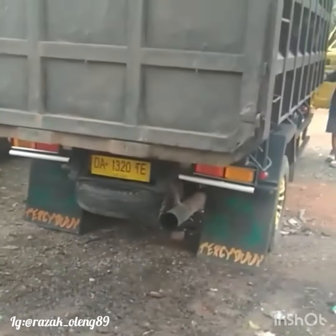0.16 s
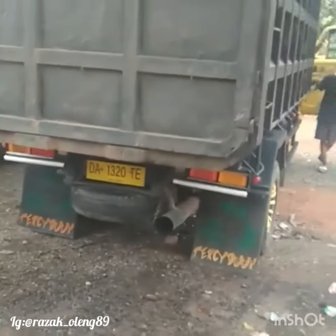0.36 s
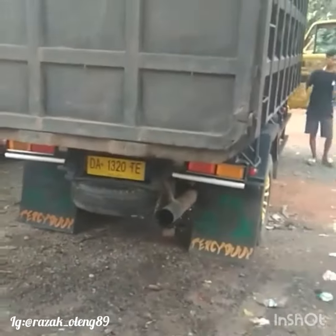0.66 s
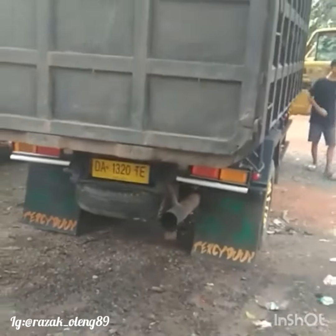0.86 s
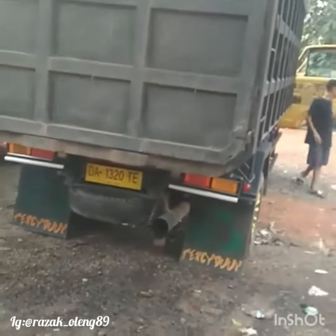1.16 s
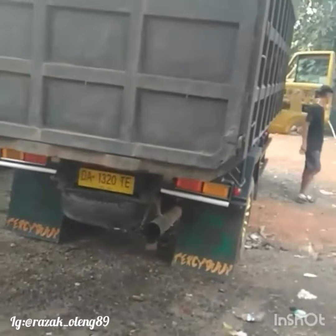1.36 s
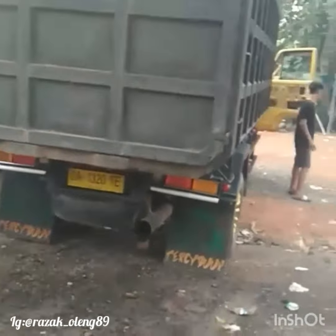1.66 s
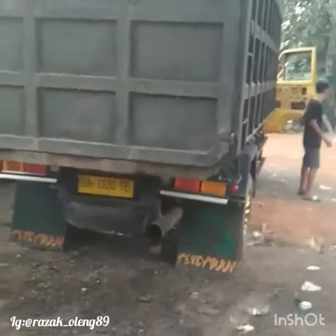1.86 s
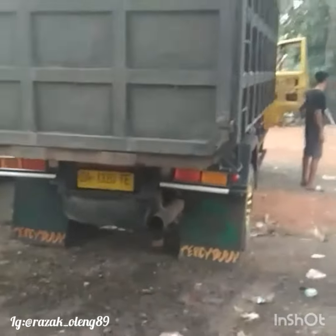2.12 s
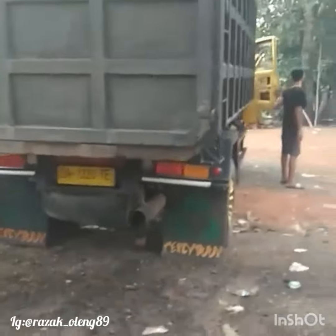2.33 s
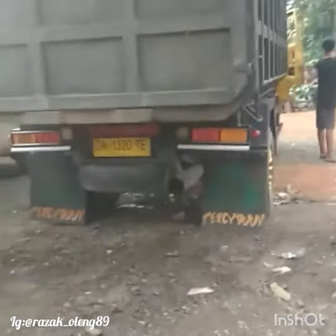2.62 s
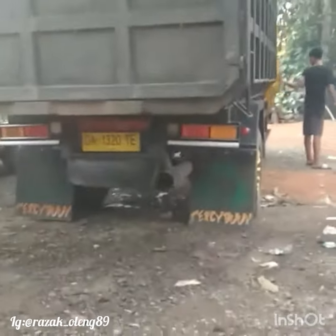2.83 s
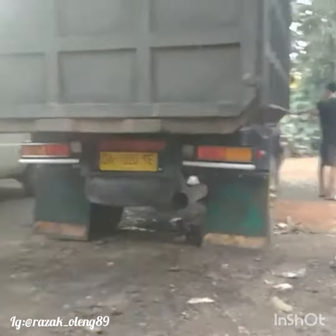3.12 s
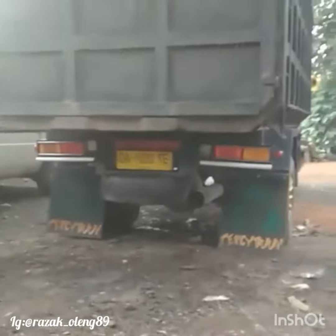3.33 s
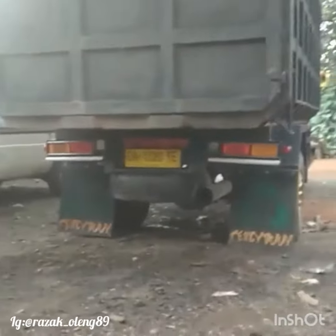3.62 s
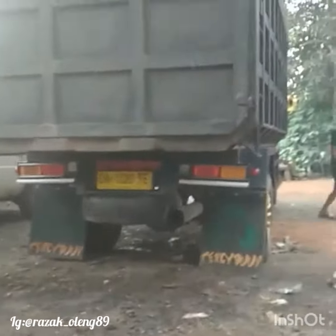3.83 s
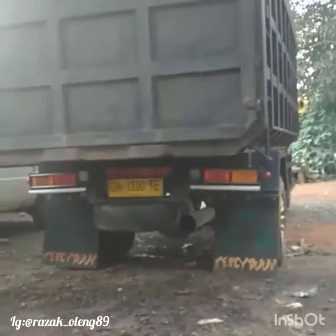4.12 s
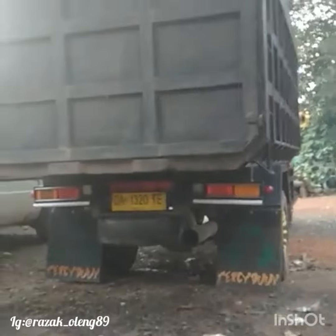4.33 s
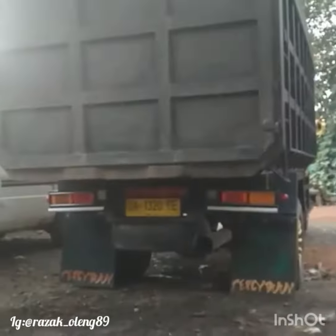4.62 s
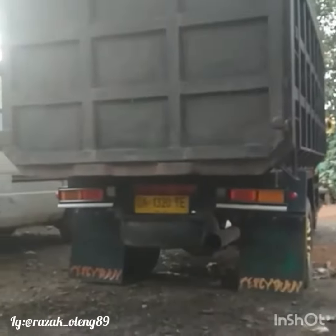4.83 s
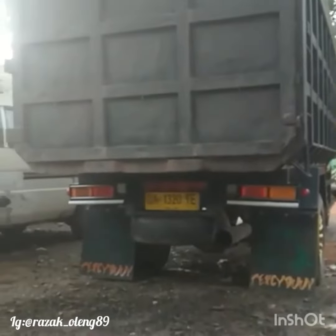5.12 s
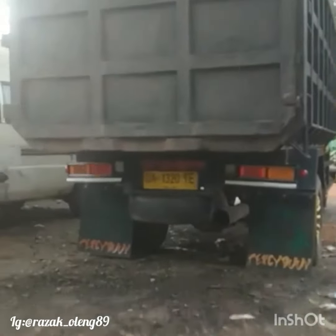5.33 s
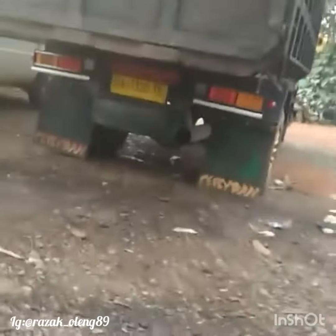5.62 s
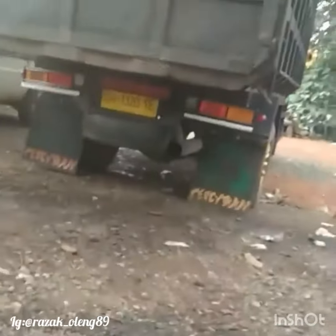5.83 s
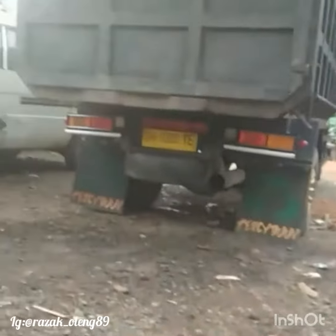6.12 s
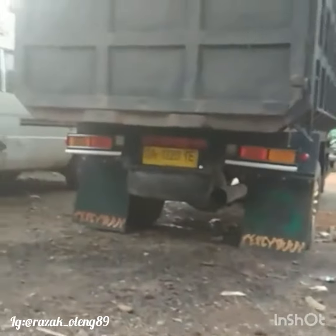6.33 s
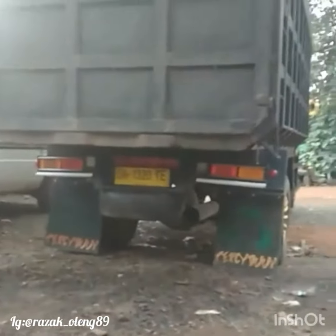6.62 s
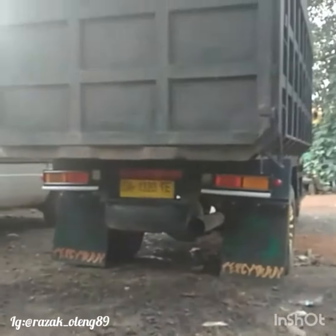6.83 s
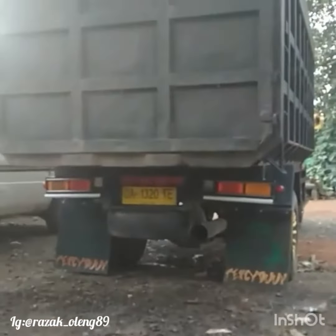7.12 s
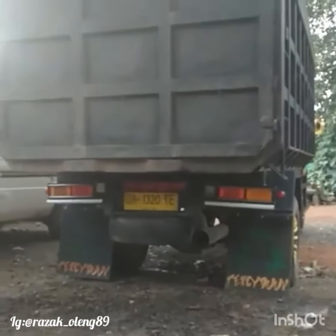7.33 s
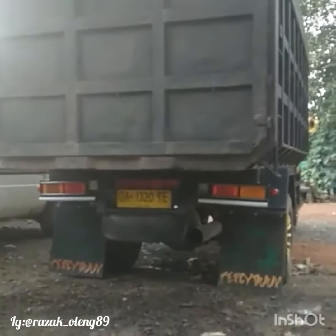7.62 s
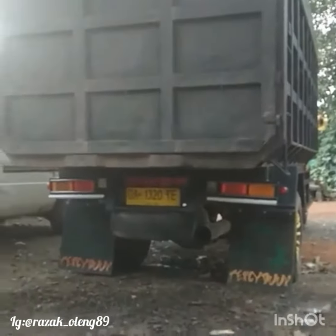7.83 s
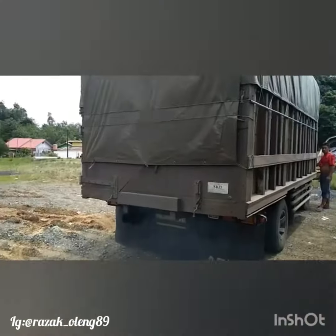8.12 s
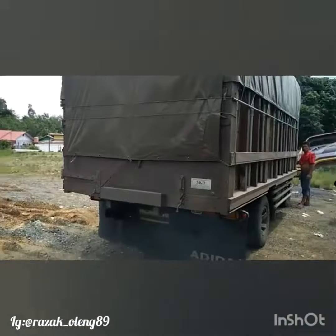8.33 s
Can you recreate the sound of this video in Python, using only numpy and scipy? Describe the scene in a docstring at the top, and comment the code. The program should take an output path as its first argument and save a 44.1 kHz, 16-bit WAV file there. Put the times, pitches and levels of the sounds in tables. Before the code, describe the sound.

A low, loping diesel idle with deep puffs and knocking dominates, heard near the exhaust in open air. Over it lie gritty crunches, small stone snaps, metallic clinks, thin chirps and an empty steel box booming once. Later the engine surges in pulses and wet hiss increases. The sound cuts out very briefly, then a far louder, fast, buzzing truck exhaust barks and drops in pitch until the abrupt end.

```python
"""A slow, loping diesel is heard first: a dump truck with four cylinders creeps over wet gravel.
Its cylinders send unequal blasts and puffs of gas through an open tailpipe and knock on the engine block.
Filtered noise makes grit crunch and hiss, ringing tones make steel knock and boom, gliding tones squeak.
After a short silence a second truck, far louder, barks and comes down from a rev: a sum of sliding
harmonics with rasping noise at each firing."""
import sys
import numpy as np
from scipy import signal
from scipy.fft import rfft, irfft, next_fast_len
from scipy.io import wavfile
from scipy.ndimage import uniform_filter1d

SR = 44100
rng = np.random.default_rng(int(sys.argv[2]) if len(sys.argv) > 2 else 0)


def transcribe(signal):
    """Save signal, clipped to [-1, 1], as a 16-bit WAV file at the path in sys.argv[1]."""
    frames = np.atleast_2d(signal).T
    limited = np.clip(frames, -1, 1)
    pcm = np.round(limited * 32767).astype(np.int16)
    wavfile.write(sys.argv[1], SR, pcm)


N = 373304
T = np.arange(N) / SR  # time of every sample in seconds

# The four cylinders of the slow engine. Each row: lag behind even firing in seconds, pitch of its chuff in Hz,
# chuff level in dB, chuff rise in seconds, level of its deep thump in dB.
CYLINDERS = [(.0092, 108.4, -0.5, 0.0089, -40), (-.0029, 142.6, -8, 0.03, -15.5),
             (.0083, 129.4, -5, 0.014, -23.5), (.0195, 116, -4, 0.0041, -17)]
# The silence between the trucks: its start and end in seconds.
SILENCE = (7.84, 7.916)
# Tone of flying grit and small stones. Each row: pitch in Hz, relative level in dB per Hz.
GRIT_TONE = [(800, 7), (3000, 5.5), (4500, 11.5), (5800, 4), (7500, 11), (13000, 6)]


def idle(jitter_s=0.0003, uneven_db=1.0, labour_jitter_s=0.001506, labour_uneven_db=1.0, gas_db=-44,
         metal_db=-49.0, puff_s=0.13, steady=0.92, repeat=0.45, rumble_db=-43):
    """Four unequal cylinders knock, ring the pipe and each let out a puff of gas."""
    # Ringing of tailpipe and silencer. Each row: pitch in Hz, width in Hz, level in dB.
    pipe_modes = [(37.9, 3.9, 21), (60.5, 5.1, 20), (110.6, 4, 7.5), (153.7, 4.5, 6.5), (188.8, 6.6, 16),
                  (241, 7.8, 18.5)]
    # Tone of the gas and clatter. Each row: pitch in Hz, relative level in dB per Hz.
    gas_tone = [(100, -34.5), (170, -1.5), (318, -8), (364, -9.5), (404, -15), (462, -9.5), (586, -8.5),
                (790, -12), (903, -14), (1350, -14.5), (2180, -20.5), (4130, -33), (6000, -49.5),
                (7800, -113), (13200, -120)]
    # Tone of the formless rumble. Each row: pitch in Hz, relative level in dB per Hz.
    rumble_tone = [(10, -29), (25, -21), (40, -24), (70, 0), (115, -8.5), (160, -4.5), (220, -6.5),
                   (400, -20), (900, -91.5)]
    # Metal parts that ring in the clatter. Each row: pitch in Hz, width in Hz, level in dB.
    metal_modes = [(370.3, 58, 7), (452.3, 23, 6.5), (804, 45, -3), (1034, 140, -3), (1300, 26, -24)]
    # Exhaust level over time. Each row: time in seconds, level in dB.
    exhaust_levels = [(0, -30.5), (1.8, -33), (2.6, -30.5), (3.8, -31.5), (4.8, -31), (6.2, -32.5),
                      (7.3, -32), (7.84, -29.5)]
    # The engine hunts under load and surges on every other cycle. Each row: time in seconds, gain in dB.
    surges = [(5.43, 4), (5.93, 5), (6.41, 6.5), (6.89, 5.5), (7.36, 4)]
    # The part of the pipe's note that swells. Each row: pitch in Hz, width in Hz, level in dB.
    surge_modes = [(122, 160, 4.5)]
    firings_per_s, sag_per_s = 16.9, 0.03  # rate at the opening, and its loss each second under load
    first_firing_s, lead_s, surge_width_s = 0.103, 0.6, 0.06
    labour_from_s, labour_build_s = 5.7, 1.0  # the engine starts to labour and fires more raggedly
    knock_delay_s = 0.0251

    clock = T - lead_s  # the engine is already running when the scene opens
    count = np.cumsum(firings_per_s - sag_per_s * clock) / SR
    count -= np.interp(first_firing_s, clock, count)
    k = np.arange(-2 * len(CYLINDERS), int(count[-1]))
    cylinder = k % len(CYLINDERS)
    chance = rng.standard_normal((len(k), 2))
    beat = np.interp(k, count, clock)
    labour = np.clip((beat - labour_from_s) / labour_build_s, 0, 1)
    lag = np.array(CYLINDERS)[cylinder, 0]
    firing = beat + lag + (jitter_s + labour_jitter_s * labour) * chance[:, 0]
    size = amp((uneven_db + labour_uneven_db * labour) * chance[:, 1])  # no two firings are alike

    blasts = chuffs(firing + lead_s, cylinder, size)
    # the narrow modes outlast a firing, so neighbouring blasts add or cancel
    ring = blasts + resonate(blasts, pipe_modes)
    # an open pipe radiates no slow flow
    ring = signal.sosfiltfilt(signal.butter(2, 22, "high", fs=SR, output="sos"), ring)

    # part of the clatter comes back alike with every turn of the camshaft
    cycle_start = clicks(firing + lead_s, cylinder == 0)
    one_cycle = rng.standard_normal((2, int(SR * len(CYLINDERS) / firings_per_s)))
    clatter = signal.oaconvolve(cycle_start[None], one_cycle, axes=1)[:, :N]
    share = np.clip(repeat, 0, 1)
    repeating = unit(colour(spread(clatter), gas_tone))
    gas = np.sqrt(share) * repeating + np.sqrt(1 - share) * noise(gas_tone)
    gas *= unit(steady + fade(clicks(firing + lead_s, size), puff_s))
    gas = amp(gas_db) * gas + amp(metal_db) * unit(resonate(gas, metal_modes))

    # drop the lead-in so that both parts start with the scene
    ring, gas = (np.roll(part, -int(lead_s * SR), axis=-1) for part in (unit(ring), gas))
    low = amp(curves(exhaust_levels)[0]) * ring + amp(rumble_db) * noise(rumble_tone)
    surge_db = sum(db * np.exp(-((T - at) / surge_width_s) ** 2) for at, db in surges)
    surge = (amp(surge_db) - 1) * resonate(low, surge_modes)
    return low + surge + gas + diesel_knock(beat + knock_delay_s, cylinder)


def chuffs(s, cylinder, size, detune=0.02, thump_hz=53.8, thump_rise_s=0.011, thump_delay_s=0.0099,
           climb_hz_per_s=170):
    """Each cylinder's blast hoots near its own pitch over a deep thump, so the idle rises and falls once a cycle."""
    t = T[:SR // 4]

    def hoot(t, hz, rise_s, climb=0):
        """A tone that swells and dies, climbing through hz at its peak."""
        swell = t / rise_s * np.exp(1 - t / rise_s)
        return swell * np.sin(2 * np.pi * (hz + climb * (t / 2 - rise_s)) * t)

    thump = hoot(np.maximum(t - thump_delay_s, 0), thump_hz, thump_rise_s)
    out = np.zeros(N)
    for start, k, gain, chance in zip(s, cylinder, size, rng.standard_normal(len(s))):
        _, hz, db, rise_s, thump_db = CYLINDERS[k]
        chuff = amp(db) * hoot(t, hz * (1 + detune * chance), rise_s, climb_hz_per_s)
        blast = gain * (chuff - amp(thump_db) * thump)
        part = out[max(int(start * SR), 0):][:len(t)]
        part += blast[:len(part)]
    return out


def diesel_knock(s, cylinder, knock_db=-44, decay_s=0.019, rise_s=0.00095, uneven_db=2, ring_db=1):
    """Each ignition cracks against the engine block; one cylinder knocks hardest."""
    # Strength of the knock between exhaust blasts: one level in dB for each cylinder.
    cylinder_db = [-4.5, -3, -11.5, -0.5]
    # Tone of the knock. Each row: pitch in Hz, relative level in dB per Hz.
    knock_tone = [(250, -23), (500, 10), (1000, 2.5), (1600, 4), (2600, -6), (4300, -12), (6000, -29),
                  (13000, -30)]
    # Ringing of the engine block. Each row: pitch in Hz, width in Hz, level in dB.
    block_modes = [(880, 90, -2), (1495, 110, -6.5), (1900, 100, -9.5), (2660, 220, 5)]
    strikes = clicks(s, amp(np.array(cylinder_db)[cylinder] + uneven_db * rng.standard_normal(len(s))))
    crack = (fade(strikes, decay_s) - fade(strikes, rise_s)) * noise(knock_tone, grain_db=2)
    return amp(knock_db) * (crack + amp(ring_db) * resonate(crack, block_modes))


def rev(waver=0.0025, jitter_turns=0.0043, rough_db=2.2, drive=0.61, crack_db=-31, rasp_db=-30.5,
        puff_s=0.0022, between=0.38, air_db=-40, open_share=0.61, crest_share=0.09, cresting=0.28,
        ragged_db=1.7, burble_db=-30, coast_burble_db=2):
    """Each firing is a pressure step up and a step back down; gas rasps at the fronts and burbles in the pipe."""
    # Speed of the second truck's engine. Each row: time in seconds, firings per second.
    rev_speed = [(7.92, 74.5), (8, 74.3), (8.054, 72.3), (8.11, 70.1), (8.168, 69), (8.227, 66.6),
                 (8.289, 63.2), (8.354, 60.7), (8.46, 57.6)]
    # Exhaust note on the throttle. Each row: multiple of the firing rate, level in dB.
    pulling = [(0.5, -14), (1, -0.5), (1.5, -27), (2, -4), (2.5, -16), (3, -15.5), (3.5, -39), (4, -6.5),
               (4.5, -40), (5, -17), (5.5, -37), (6, -22.5), (6.5, -38), (7, -19.5), (7.5, -42), (8, -21),
               (8.5, -31), (9, -35)]
    # Exhaust note off the throttle. Each row: multiple of the firing rate, level in dB.
    coasting = [(0.5, -22), (1, 1), (1.5, -26), (2, -5), (2.5, -12), (3, -9), (3.5, -31), (4, -8),
                (4.5, -32), (5, -27.5), (5.5, -29), (6, -21.5), (6.5, -43), (7, -32.5), (7.5, -43),
                (8, -35), (8.5, -36), (9, -36)]
    # Pitches the pipe favours as the note slides through them. Each row: pitch in Hz, gain in dB.
    pipe_gain = [(57, -3.5), (62, 0.5), (68, -0.5), (105, 6), (118, 4.5), (128, -2.5), (142, 0.5),
                 (180, -1.5), (200, -0.5), (240, 0), (280, -0.5), (380, 1), (415, 3.5), (455, -3), (497, 4),
                 (620, -3), (700, 0)]
    # Tone of the front of each firing. Each row: pitch in Hz, relative level in dB.
    crack_tone = [(300, -34.5), (560, 21.5), (680, 6), (850, 6), (1100, -0.5), (1400, -0.5), (2200, -25),
                  (4000, -41)]
    # Tone of the rasping gas. Each row: pitch in Hz, relative level in dB per Hz.
    rasp_tone = [(100, -21), (400, 4.5), (800, -0.5), (1400, -7), (2200, -14), (3500, -30), (6000, -28.5),
                 (13000, -17.5)]
    # Tone of the turbulence in the pipe. Each row: pitch in Hz, relative level in dB per Hz.
    burble_tone = [(40, -26), (90, 0), (160, 9), (260, -0.5), (400, -1), (900, -37)]
    # Tone of the airy hiss. Each row: pitch in Hz, relative level in dB per Hz.
    air_tone = [(1000, 23), (3000, 8.5), (4800, 9.5), (6300, 6), (7700, 11), (8800, 3), (10000, 13),
                (13000, -4)]
    first_firing_s = 7.9185
    step_back = 0.55  # the pressure step back down, as a share of the step up
    full_db, start_db, swell_s = -9.5, -16, 0.22  # full level, how far below it the exhaust starts, swell time
    onset_s, air_onset_s = 0.0014, 0.019  # the bass arrives first, the hiss after it
    lift_off_s, throttle_close_s = 8.12, 0.1  # the driver lifts off the throttle
    coast_note_db, coast_rasp_db = -1.7, -4.5  # change of level once the throttle is shut
    blip_s, blip_rise_s, blip_db = 8.434, 0.02, 12.5  # the throttle is stabbed open and the rasp flares

    hz, = curves(rev_speed)
    swell = np.interp(T, [SILENCE[1], SILENCE[1] + swell_s], [amp(start_db), 1])
    shut = np.clip((T - lift_off_s) / throttle_close_s, 0, 1)
    flare = amp(blip_db * np.clip((T - blip_s) / blip_rise_s, 0, 1))
    hz = hz * (1 + waver * unit(uniform_filter1d(rng.standard_normal(N), size=600)))
    turns = np.cumsum(hz) / SR  # one turn is one firing
    # each burn comes a little early or late
    turns += jitter_turns * wander(0.007) - np.interp(first_firing_s, T, turns)
    running = T > SILENCE[1]

    note = np.zeros(N)
    for order in np.arange(1, len(pulling) + 1) / 2:
        db = (1 - shut) * read(pulling, order) + shut * read(coasting, order)
        db = db + rough_db * min(order / 4, 1) * wander(0.015)  # no two burns are alike
        db = db[running] + read(pipe_gain, order * hz[running])
        # phase that a step up followed by a smaller step down gives this harmonic
        both_steps = np.angle(1 - step_back * np.exp(-2j * np.pi * order * open_share))
        note[running] += amp(db) * np.sin(2 * np.pi * order * turns[running] + both_steps)

    def steps(u):
        """An impulse each time the count u passes a whole number."""
        return np.diff(np.floor(u), prepend=np.floor(u[0]))

    def even(x):
        """Rms 1 during the rev."""
        return x / np.sqrt(np.mean(x[..., running] ** 2))

    opens, crests = steps(turns), steps(turns - crest_share)
    closes = steps(turns - open_share - crest_share)
    blows = opens - cresting * crests - step_back * closes
    blows = blows * amp(ragged_db * rng.standard_normal(N))
    puffs = even(between + fade(abs(blows), puff_s))
    crack = amp(crack_db) * even(colour(blows, crack_tone))
    edge = crack + amp(rasp_db) * flare * puffs * noise(rasp_tone, grain_db=1.0)
    note = np.tanh(drive * even(note))  # the crests of the loud wave flatten
    exhaust = amp(full_db + coast_note_db * shut) * even(note) + amp(coast_rasp_db * shut) * edge
    exhaust = exhaust + amp(burble_db + coast_burble_db * shut) * noise(burble_tone)
    air = amp(air_db) * flare * np.sqrt(puffs) * noise(air_tone, grain_db=2.0)
    since = np.maximum(T - SILENCE[1], 0)
    exhaust_onset, air_onset = 1 - np.exp(-since / onset_s), 1 - np.exp(-since / air_onset_s)
    return exhaust_onset * swell * exhaust + air_onset * air


def tyres(crunch_db=-51, crunch_follow=0.45, hiss_db=7, patchy_db=1.27, patch_s=0.05, clump_db=2.5,
          clump_s=0.006, lean_db=-0.5):
    """Wet grit crackles under rolling tyres: hiss follows their briskness closely, coarse crunch comes in clumps."""
    # How briskly the tyres roll over the wet gravel. Each row: time in seconds, level in dB.
    rolling = [(0, -52.5), (0.45, -56.5), (1.2, -56), (2.2, -55), (2.8, -61.5), (3.7, -63), (5.2, -62),
               (6.2, -52.5), (6.85, -49), (7.3, -49), (7.8, -55)]
    # A tyre grinds through loose stones, swelling and dying away. Each row: time of the peak in seconds,
    # crunch level in dB, hiss level in dB, rise in seconds, fall in seconds.
    grinds = [(0.93, -42.5, -62, 0.067, 0.08), (1.37, -46, -42.5, 0.031, 0.29),
              (3.232, -37, -34.5, 0.033, 0.093), (4.82, -44, -42.5, 0.087, 0.063)]
    # Tone of the coarse crunch. Each row: pitch in Hz, relative level in dB per Hz.
    crunch_tone = [(200, -38), (700, 11), (1400, 4), (2500, 0), (4400, 0), (5700, -14.5), (7200, 0.5),
                   (9000, -18), (13000, -21.5)]
    # Tone of the wet hiss. Each row: pitch in Hz, relative level in dB per Hz.
    hiss_tone = [(2000, -46), (6000, -16.5), (7200, -8), (9000, -3), (10400, 4), (11500, 3.5), (13000, -1)]
    roll_db, = curves(rolling)
    crunch = amp(crunch_db + crunch_follow * (roll_db - roll_db.mean()))
    hiss = amp(roll_db + hiss_db)
    for s, stones_db, grit_db, rise_s, fall_s in grinds:
        swell = np.exp(-np.maximum((s - T) / rise_s, (T - s) / fall_s))
        crunch = np.hypot(crunch, amp(stones_db) * swell)
        hiss = np.hypot(hiss, amp(grit_db) * swell)
    crunch = crunch * amp(clump_db * wander(clump_s))  # stones give way a few at a time
    hiss = hiss * amp(patchy_db * wander(patch_s))  # the gravel lies unevenly
    lean = amp([[lean_db], [-lean_db]])  # the hiss leans to the right
    return crunch * noise(crunch_tone, grain_db=1.0) + hiss * noise(hiss_tone, grain_db=2) * lean


def knocks(rise_s=0.00053, ring_db=-1, rattle_db=1.5, rattle_s=0.0034):
    """Short dull clacks of loose steel, each with a spray of grit."""
    # Rattles of the body and stones under the tyres. Each row: start in seconds, clack level in dB,
    # spray level in dB, decay time in seconds.
    hit_list = [(0.904, -38.5, -44, 0.03), (0.935, -39, -55, 0.03), (1.016, -39, -60, 0.016),
                (1.33, -40, -37, 0.019), (2.397, -45.5, -66, 0.038), (2.463, -47, -66, 0.018),
                (2.678, -52, -66, 0.017), (2.724, -45, -69, 0.015), (2.8, -40, -56, 0.01),
                (2.909, -36.5, -58, 0.022), (3.009, -56, -39, 0.03), (3.153, -46, -56, 0.009),
                (3.187, -35, -51, 0.018), (3.2, -33.5, -38, 0.012), (3.217, -32, -44, 0.01),
                (3.238, -34, -47, 0.015), (3.367, -38.5, -45, 0.023), (3.857, -40, -58, 0.03),
                (4.347, -32, -60, 0.011), (4.825, -43, -46, 0.032), (6.018, -42, -48, 0.039),
                (6.488, -39.5, -60, 0.02)]
    # Tone of the clacks. Each row: pitch in Hz, relative level in dB per Hz.
    clack_tone = [(80, -32), (250, 7.5), (450, -16), (800, 0), (1350, 0), (2000, -3.5), (4000, -14.5),
                  (6000, -20.5), (13000, -13.5)]
    # Ringing of loose steel fittings. Each row: pitch in Hz, width in Hz, level in dB.
    fitting_modes = [(473, 18, -21), (647, 63, 14), (851, 49, 9), (1303, 26, 7), (1590, 20, -1),
                     (1980, 22, -18)]
    clack, spray = np.zeros((2, N))
    spray_rise_s = 0.0019  # the grit takes a moment to fly
    for s, clack_db, spray_db, decay_s in hit_list:
        t = np.maximum(T - s, 0)
        shape = np.exp(-t / decay_s) * (1 - np.exp(-t / rise_s))
        clack += amp(clack_db) * shape
        spray += amp(spray_db) * shape * (1 - np.exp(-t / spray_rise_s))
    rattle = amp(rattle_db * wander(rattle_s))  # the parts rebound as they settle
    hits = clack * rattle * noise(clack_tone, grain_db=1.0)
    return hits + amp(ring_db) * resonate(hits, fitting_modes) + spray * noise(GRIT_TONE, grain_db=-3.0)


def body(shudder_db=-12, shudder_s=0.053, rise_s=0.0026):
    """Blows ring the steel panels of the dump body, and the empty box shudders."""
    # Heavy blows on the dump body. Each row: time in seconds, strength in dB.
    booms = [(3.199, -13.5), (3.216, -17), (3.24, -16), (3.2521, -26), (3.2939, -23), (3.323, -26)]
    # Ringing of its panels. Each row: pitch in Hz, level in dB, time to fall by 60 dB in seconds.
    panels = [(64.4, -11, 0.25), (112, 0, 0.091), (143, -2, .3), (175.5, -12, 0.63), (235.7, -12, 0.29),
              (298.2, -18, 0.38), (400, -15, 0.17)]
    shudder_tone = [(15, -24), (50, 11), (120, 10.0), (330, 1.5), (500, -16), (1500, -35.5)]  # Hz, dB per Hz
    t = T[:SR // 2]
    ring = sum(amp(db - 60 * t / t60) * np.sin(2 * np.pi * hz * t) for hz, db, t60 in panels)
    ring = ring * (1 - np.exp(-t / rise_s))
    s, db = np.transpose(booms)
    blows = clicks(s, amp(db))
    shudder = fade(blows, shudder_s) * noise(shudder_tone)
    return signal.oaconvolve(blows, ring)[:N] + amp(shudder_db) * shudder


def chatter(per_s=22, spread_db=3.5, decay_s=0.014):
    """Loose steel parts knock at random, each ringing at its own pitch."""
    # Level of the chattering as the truck rocks. Each row: time in seconds, level in dB.
    chatter_levels = [(0, -55), (1, -51), (1.8, -57), (2.3, -49.5), (2.85, -57), (3.6, -51), (7.8, -55)]
    # The loose parts. Each row: pitch in Hz, width in Hz, level in dB.
    part_modes = [(356, 29, -6), (608, 55, -2), (793, 26, 6), (1130, 83, -1.5), (1370, 78, -5.5)]
    out = np.zeros((2, N))
    for mode in part_modes:
        s, size = rng.random((int(per_s * T[-1]), 2)).T
        taps = fade(clicks(s * T[-1], amp(spread_db * -np.log(size + .05))), decay_s)
        out += resonate(taps * rng.standard_normal((2, N)), [mode])
    return amp(curves(chatter_levels)[0]) * unit(spread(out))


def squeaks(waver=0.013, waver_s=0.0016):
    """Tiny gliding chirps and creaks with a wavering pitch."""
    # Thin squeaks and creaks of the springs and body. Each row: time of the peak in seconds, level in dB,
    # pitch in Hz, length in seconds, glide in Hz per second.
    squeak_list = [(.204, -47, 10350, .0086, 17997), (0.673, -45.5, 10400, 0.018, 17981),
                   (1.03, -48, 10300, .0086, 18000), (1.152, -40, 10350, 0.008, 17995),
                   (1.385, -41.5, 10350, 0.0077, 18000), (2.574, -47, 10350, .0086, 17997),
                   (2.713, -48, 1420, .04, -800), (2.81, -50, 1405, 0.02, 0), (2.93, -46, 1354, .03, 1500),
                   (3.409, -45.5, 10300, 0.0095, 17998), (4.639, -44.5, 1700, 0.016, 0),
                   (4.678, -53, 2260, .025, 800), (4.757, -54, 2670, .04, 0),
                   (4.824, -49, 1705, .02, -1500), (4.885, -49, 1570, .03, 0),
                   (4.958, -45, 1520, .022, -1000), (5.135, -47, 1720, 0.015, 7),
                   (5.148, -45.5, 1085, .04, 600), (7.417, -41, 10300, 0.0079, 18000)]
    out = np.zeros(N)
    t = np.arange(-SR // 10, SR // 10) / SR
    unsteady = 1 + waver * wander(waver_s)
    for s, db, hz, length_s, glide in squeak_list:
        span = int((s + t[0]) * SR) + np.arange(len(t))
        pitch = glide * t + hz * unsteady[span]
        tone = np.sin(2 * np.pi * np.cumsum(pitch) / SR)
        out[span] += amp(db) * np.exp(-(t / length_s) ** 2) * tone
    return out


def pebbles(per_s=4, softest_db=-56, spread_db=3, decay_s=0.014):
    """Now and then a small stone snaps under a tyre."""
    s, size = rng.random((int(per_s * T[-1]), 2)).T
    snaps = clicks(s * T[-1], amp(spread_db * 2 * size))
    return amp(softest_db) * fade(snaps, decay_s) * noise(GRIT_TONE)


def clinks(per_s=45, low_hz=750, high_hz=3200, base_db=-52, fall_db_per_octave=5, spread_db=3, cycles=24):
    """Stones and chain links click together, each with a short ring at its own pitch."""
    out = np.zeros((2, N))
    t = T[:SR // 10]
    for when, pitch, size, left, right in rng.random((int(per_s * T[-1]), 5)):
        hz = low_hz * (high_hz / low_hz) ** pitch
        db = base_db - fall_db_per_octave * np.log2(hz / low_hz) - spread_db * np.log(size + .05)
        phase = np.pi * np.array([[left], [right]])
        ring = amp(db) * np.exp(-t * hz / cycles) * np.sin(2 * np.pi * hz * t + phase)
        part = out[:, int(when * N):][:, :len(t)]
        part += ring[:, :part.shape[1]]
    return out


def amp(db):
    """Decibels to gain."""
    return 10 ** (np.asarray(db) / 20)


def unit(x):
    """Scales to rms 1."""
    return x / np.sqrt(np.mean(x ** 2) + 1e-20)


def read(points, hz):
    """Reads a spectrum on a log-frequency axis."""
    f, value = np.transpose(points)
    return np.interp(np.log(hz + 1), np.log(f + 1), value)


def curves(rows, t=T):
    """Reads each column of a table at the times t."""
    s, *columns = np.transpose(rows)
    return [np.interp(t, s, c) for c in columns]


def colour(x, spectrum, size=8192):
    """Filters x to the given spectrum, without any sound ahead of its cause."""
    log_gain = np.log(amp(read(spectrum, abs(np.fft.fftfreq(size, 1 / SR)))))
    # the Hilbert transform gives the minimum phase that belongs to this gain
    taps = np.fft.ifft(np.exp(np.conj(signal.hilbert(log_gain)))).real[:size // 2]
    return signal.oaconvolve(np.atleast_2d(x), taps[None], axes=1)[:, :N]


def spread(pair):
    """Two unrelated signals become a stereo pair: mono bass, wide treble."""
    # Likeness of left and right. Each row: pitch in Hz, likeness (1 is identical, 0 unrelated).
    likeness = [(30, 1), (130, 0.98), (250, 1), (600, 0.86), (1200, 0.56), (2500, 0.34), (5000, 0.063),
                (12000, -0.075)]
    a, b = rfft(pair, next_fast_len(N))
    same = np.clip(read(likeness, np.linspace(0, SR / 2, len(a))), -1, 1)
    mid, side = a * np.sqrt((1 + same) / 2), b * np.sqrt((1 - same) / 2)
    return irfft([mid + side, mid - side], next_fast_len(N))[:, :N]


def noise(spectrum, grain_db=0):
    """Stereo noise of rms 1; grain_db lifts some instants out as grains, or dips them if negative."""
    size = amp(grain_db * np.minimum(rng.exponential(1, N // 16 + 1), 6)).repeat(16)[:N]
    return unit(colour(spread(rng.standard_normal((2, N)) * size), spectrum))


def clicks(times, sizes):
    """Impulses at the given times."""
    at = np.round(np.asarray(times) * SR).astype(int)
    inside = (at >= 0) & (at < N)
    return np.bincount(at[inside], np.asarray(sizes)[inside], N)


def fade(x, seconds):
    """Gives each impulse an exponential tail."""
    return signal.lfilter([1], [1, -np.exp(-1 / (SR * seconds))], x)


def resonate(x, modes):
    """Passes x through a bank of resonances."""
    return sum(amp(db) * signal.lfilter(*signal.iirpeak(hz, hz / width, fs=SR), x) for hz, width, db in modes)


def wander(seconds):
    """Slow chance of rms 1 that changes over about the given time."""
    knots = np.arange(0, T[-1] + seconds, seconds)
    return unit(np.interp(T, knots, rng.standard_normal(len(knots))))


def scene():
    """The creeping truck, a silence, the revving truck."""
    first = idle() + tyres() + knocks() + body() + chatter() + squeaks() + pebbles() + clinks()
    return first * (T < SILENCE[0]) + rev() * (T > SILENCE[1])


def record(dry):
    """Cuts the treble above the band limit with a steep low-pass filter."""
    edge_hz = 13200
    taps = signal.firwin(511, edge_hz, window=("kaiser", 9), fs=SR)
    return signal.oaconvolve(dry, taps[None], "same")


dry = scene()
out = record(dry)
transcribe(out)
```